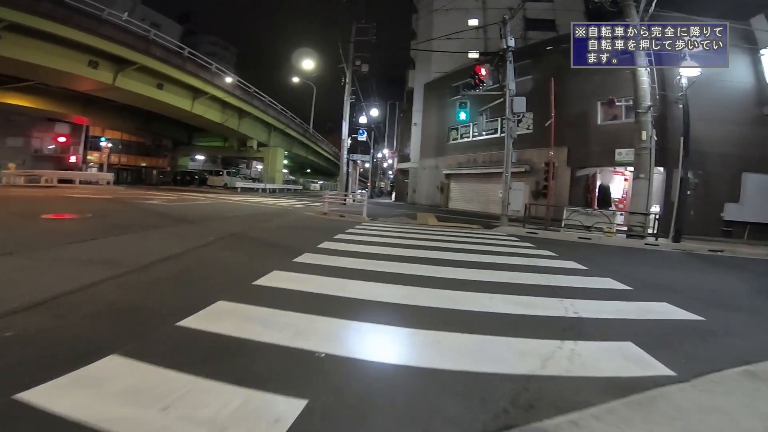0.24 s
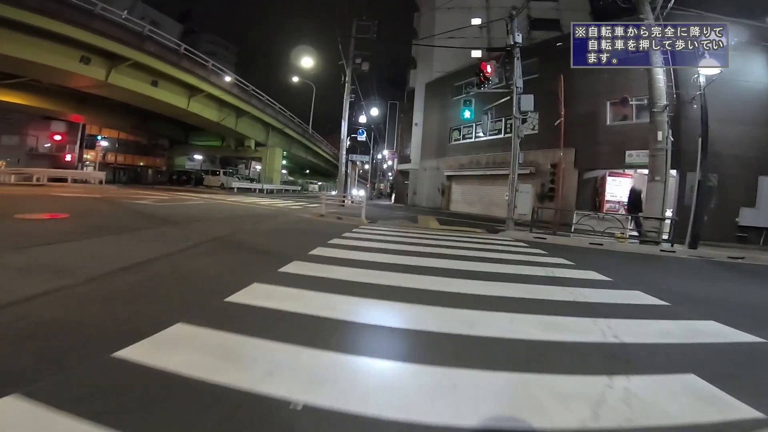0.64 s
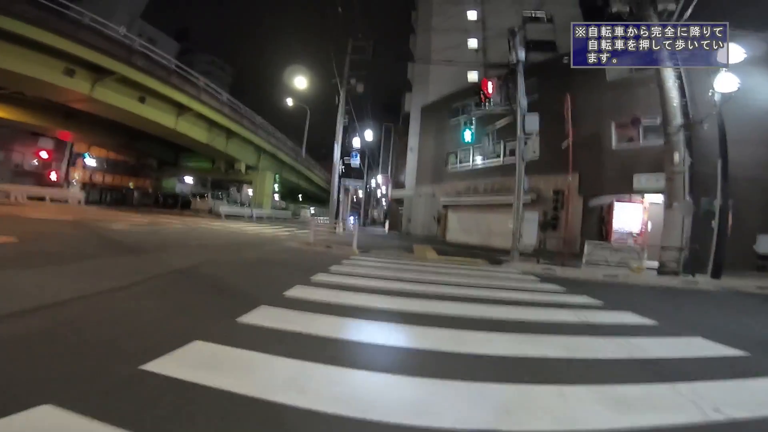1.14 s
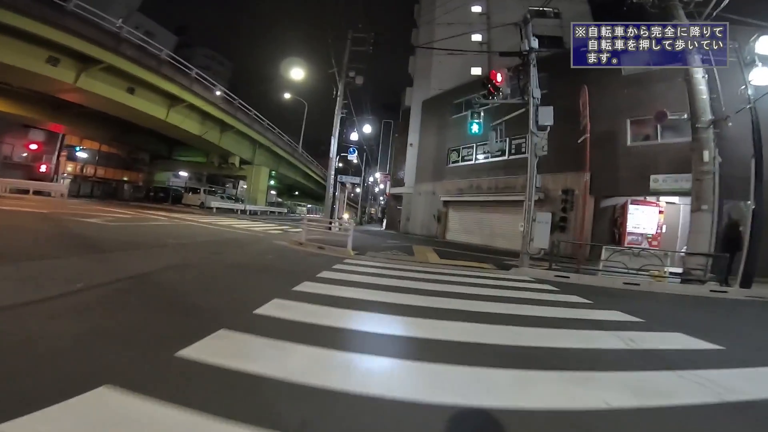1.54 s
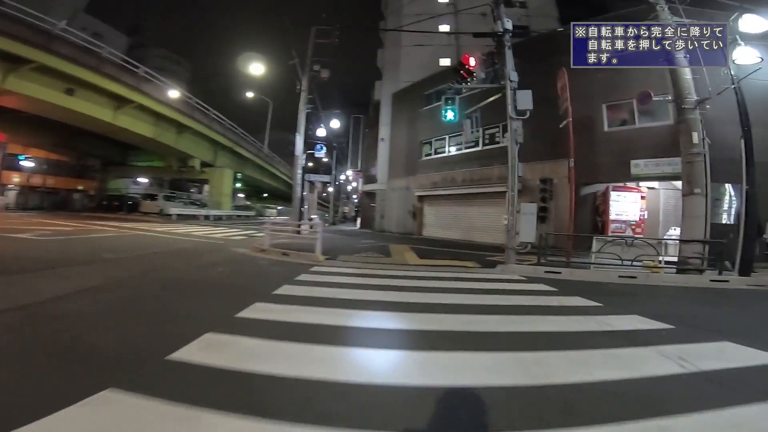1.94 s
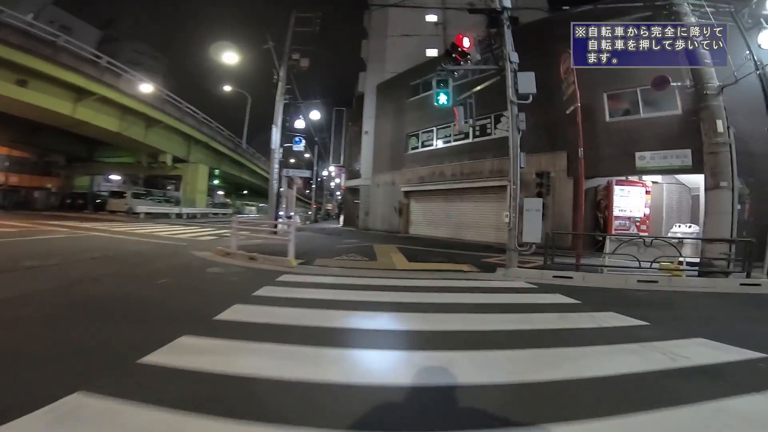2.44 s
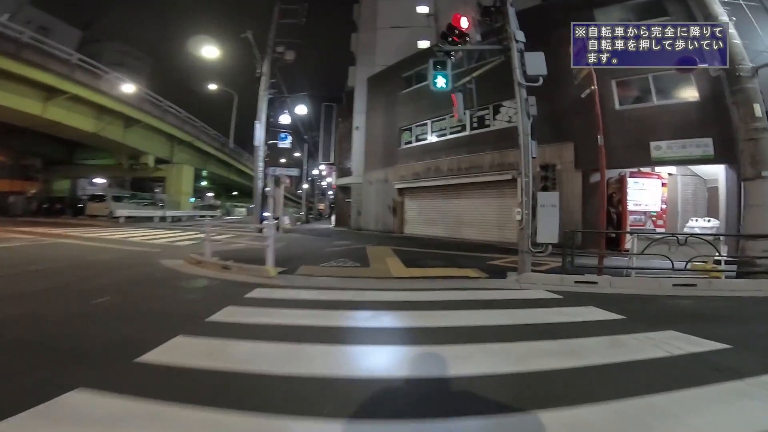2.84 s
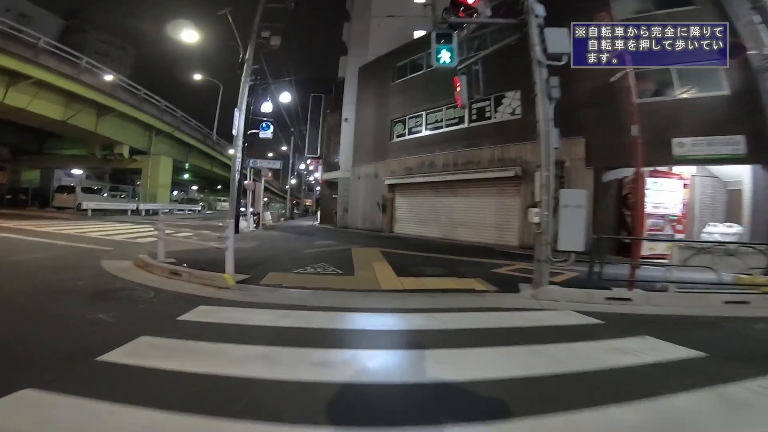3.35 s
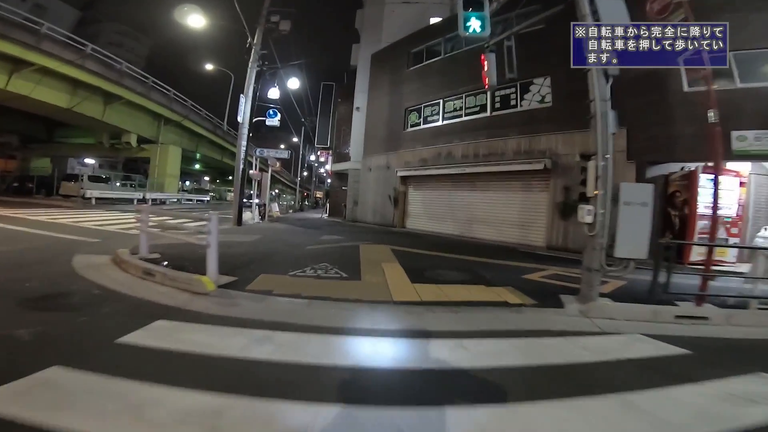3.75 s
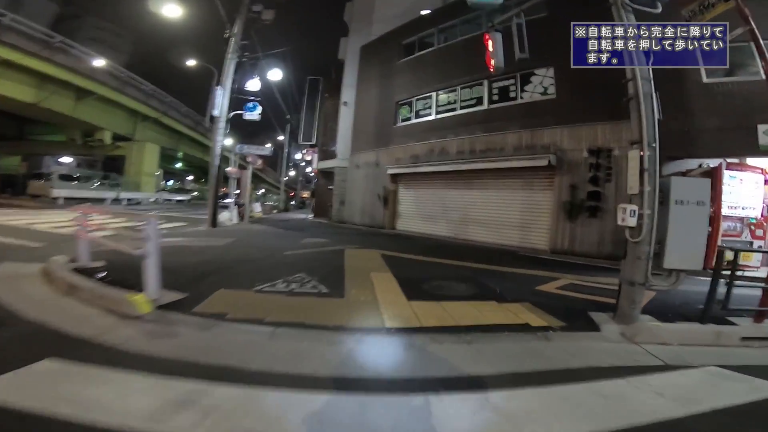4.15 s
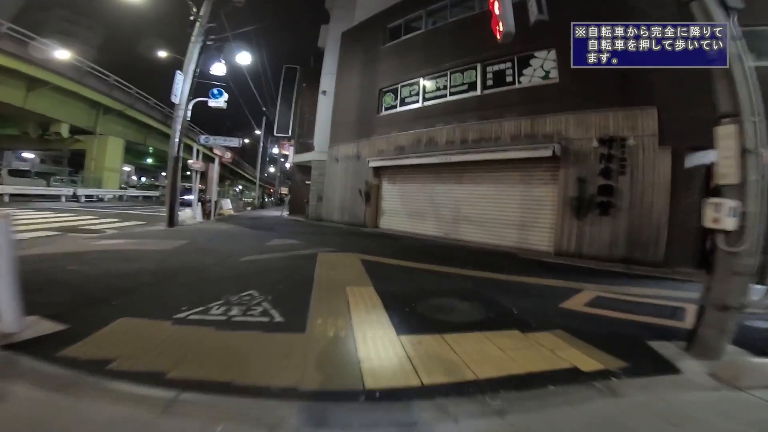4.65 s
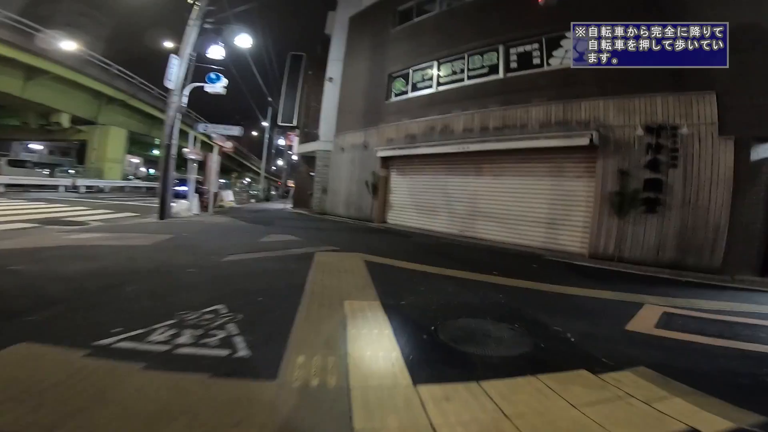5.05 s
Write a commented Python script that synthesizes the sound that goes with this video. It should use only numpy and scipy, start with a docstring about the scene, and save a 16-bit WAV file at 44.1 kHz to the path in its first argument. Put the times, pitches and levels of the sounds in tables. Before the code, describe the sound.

A quiet outdoor street with dull, far-off traffic. Close up, a walked bicycle rumbles and sways, its hub ticking quickly and lightly. An early crowded clatter of kerb bumps gives way to spaced low thuds, small snaps and brief scuffs; two strong knocks come late, then a final cluster. The single-channel sound is close, mount-borne and bass-heavy, slightly flattened on the hardest hits.

```python
"""A bicycle with a microphone on its handlebar is pushed over a kerb and a striped crossing on a quiet night street.
Far traffic, shaped noise, lies under all; the frame sways, tyres rumble, and grit and loose parts click and scuff.
From 0.3 s the freewheel ticks as noise bursts with hub rings; near 0.5 s the first bumps and lurches come.
From 0.95 to 1.4 s kerb bumps crowd together as damped bounces, knocks and cracks; then footfalls and lurches
come more thinly, with hard bumps near 4.2 and 4.7 s and a last cluster near 5.2 s."""
import sys
import numpy as np
from scipy import signal
from scipy.fft import rfft, irfft
from scipy.io import wavfile
from scipy.ndimage import uniform_filter1d

SR = 44100
rng = np.random.default_rng(int(sys.argv[2]) if len(sys.argv) > 2 else 0)


def store_wav(level_fs):
    """Save 16-bit WAV to argv[1]."""
    pcm = np.round(np.clip(np.atleast_2d(level_fs), -1, 1) * 32767)
    wavfile.write(sys.argv[1], SR, pcm.T.astype(np.int16))


N = 233638
AFTER = np.arange(6000) / SR  # time since the start of an event, s


def undb(db):
    """Level to amplitude: 20 dB is a factor of ten."""
    return 10 ** (np.asarray(db) / 20)


def unit(x):
    """Normalisation to an RMS amplitude of one."""
    return x / np.sqrt(np.mean(x ** 2))


def band(x, lo_hz, hi_hz):
    """Band limitation by a Butterworth band-pass of design order two."""
    sos = signal.butter(2, [lo_hz, min(hi_hz, .45 * SR)], "band", fs=SR, output="sos")
    return signal.sosfilt(sos, x)


def noise_band(lo_hz, hi_hz):
    """Band-limited Gaussian noise of unit RMS."""
    return unit(band(rng.standard_normal(N), lo_hz, hi_hz))


def curve(rows):
    """Linear interpolation of a table's columns over time."""
    s, *columns = np.transpose(rows)
    return [np.interp(np.arange(N) / SR, s, c) for c in columns]


def add(out, s, x):
    """Superposition: mixes x in from time s."""
    i = max(int(s * SR), 0)
    out[i:i + len(x)] += x[:N - i]


def walk(rate):
    """Slow random modulation: levels held for 1 / rate s and slewed twice; spread near 1."""
    k = int(SR / rate)
    held = np.repeat(rng.standard_normal(N // k + 1), k)
    return unit(uniform_filter1d(uniform_filter1d(held, k), k)[:N])


def ring(hz, t60, rise_s):
    """Damped resonance: a mode swells for rise_s, then decays exponentially by 60 dB in t60."""
    swell = np.sin(np.pi / 2 * np.minimum(AFTER / rise_s, 1)) ** 2
    decay = 1000. ** (-np.maximum(AFTER - rise_s, 0) / t60)
    return swell * decay * np.sin(2 * np.pi * hz * AFTER)


def town():
    """Spectral shaping of noise: far traffic, in octave bands that swell together and flicker alone."""
    # colour of the traffic: f/Hz, relative spectral level/dB
    town_colour = [(35, -19), (60, -1.5), (87, -26), (183, -20), (253, -13.5), (368, -24.5), (486, -21),
                   (572, -25), (738, -21.5), (1350, -26), (2840, -41.5), (5450, -47), (15500, -67)]
    # loudness of the traffic: t/s, level/dB
    town_swell = [(0.0, -52.5), (0.93, -49.5), (1.44, -49.5), (3.49, -48), (4.92, -50)]
    hz = np.fft.rfftfreq(N, 1 / SR) + 1
    colour_hz, colour_db = np.transpose(town_colour)
    gain = undb(np.interp(np.log(hz), np.log(colour_hz), colour_db))
    colour = rfft(rng.standard_normal(N)) * gain
    colour /= np.std(band(irfft(colour, N), 373, 2700))
    out = 0
    for octave in range(5, 15):  # centred on 2 ** octave Hz
        share = np.clip(1 - np.abs(np.log2(hz) - octave), 0, 1)
        flicker = undb((0.65 - 0.036 * octave) * walk(23))
        out = out + flicker * irfft(colour * share, N)
    return out * undb(curve(town_swell)[0] + 1.0 * walk(2.63))


def rolling():
    """Forced vibration: the frame sways and the tyres keep the mount trembling near its bounce."""
    # rolling shake, strongest over the kerb: t/s, sway level/dB, tyre rumble level/dB
    roll_levels = [(0.0, -32.5, -48), (0.55, -33.5, -48), (0.85, -28, -49), (0.96, -23, -39.5),
                   (1.38, -23.5, -30.5), (1.47, -33, -52), (1.66, -28.5, -43.5), (2.25, -25.5, -41),
                   (2.5, -33.5, -44.5), (2.71, -25.5, -40.5), (3.3, -31, -39.5), (3.42, -29, -44.5),
                   (3.64, -24.5, -41.5), (3.98, -25.5, -44), (4.7, -25, -41.5), (5.29, -34, -49)]
    sway_db, tyre_db = curve(roll_levels)
    sway = noise_band(6.95, 23.9) + undb(-12.0) * noise_band(39.4, 66)
    tremble = noise_band(88, 141.6)
    tremble = tremble + undb(-4.5) * noise_band(44, 185)
    tremble = tremble + undb(-14.5) * noise_band(253, 408)
    return undb(sway_db + 1.7 * walk(9.1)) * sway + undb(tyre_db + 2.1 * walk(14)) * tremble


def freewheel():
    """Impact excitation: pawls dropping milliseconds apart blur into one hiss per tooth; the hub shell rings."""
    # turning of the rear wheel: t/s, ratchet teeth passed
    wheel_turn = [(0.3077, 0), (0.444, 1), (0.5556, 2), (0.7632, 4), (0.856, 5), (1.1039, 8), (1.4244, 12),
                  (1.5848, 14), (1.81, 17), (2.5136, 26), (2.9413, 32), (3.24, 36), (3.6227, 41),
                  (4.1475, 48), (4.2166, 49), (4.4343, 52), (4.9536, 59), (5.1823, 62), (5.2644, 63)]
    # levels used in turn for 15 ticks, recurring each turn: level/dB, high ring/dB re level, # low ring/dB re
    # level; both rings also vary by chance
    tick_levels = [(-50, -4, -8), (-50.5, -5.5, -1), (-50, -13, -10), (-47.5, -27, -8), (-48, -17, -9),
                   (-47.5, -12, -24), (-48, -14, -16), (-50, -15, -5), (-50, -15, -3), (-50, -23, -8),
                   (-50, -10, -11), (-53.5, -9, -9), (-52.5, -12, -3), (-51.5, -14, -10), (-52.5, -9, -3)]
    # hub shell modes, high then low: f/Hz, width/Hz, level/dB
    hub_modes = [(10020, 1500, -5), (5460, 560, -7.5)]
    tick_scatter_db, ring_scatter_db = 0.9, 3.5
    out = np.zeros(N)
    shape = np.minimum(AFTER / 0.0015, 1) * np.exp(-(AFTER / 0.0071) ** 2)
    times, teeth = np.transpose(wheel_turn)
    for tooth in range(int(teeth[-1]) + 1):
        noise = rng.standard_normal(len(AFTER))
        db, *ring_db = tick_levels[tooth % len(tick_levels)]
        tick = undb(-11.5) * unit(band(noise, 5800, 15300)) + undb(-6) * unit(band(noise, 3200, 8700))
        for (hz, width_hz, mode_db), tick_ring_db in zip(hub_modes, ring_db):
            level = undb(tick_ring_db + mode_db + ring_scatter_db * rng.standard_normal())
            tick = tick + level * unit(band(noise, hz - width_hz / 2, hz + width_hz / 2))
        level = undb(db + tick_scatter_db * rng.standard_normal())
        add(out, np.interp(tooth, teeth, times), level * shape * tick)
    return out


def clicks():
    """Transient excitation: a sharp snap with a short noisy tail, band-limited around its centre."""
    # single clicks of grit and loose parts: t/s, peak level/dB, centre f/Hz
    click_list = [(0.188, -44, 2200), (0.2662, -47, 3500), (0.592, -39, 3600), (0.6062, -35, 3500),
                  (0.6468, -43, 5200), (0.923, -30, 5530), (0.9345, -28.5, 4700), (0.938, -32, 2970),
                  (0.951, -26, 2900), (0.992, -38, 5400), (1.018, -33, 1900), (1.0342, -43, 2200),
                  (1.0891, -35, 1700), (1.1105, -30, 1090), (1.1531, -31, 5600), (1.1763, -28, 3100),
                  (1.2098, -39, 3000), (1.2288, -38, 3330), (1.2489, -40, 2090), (1.2613, -29, 3820),
                  (1.267, -41, 2500), (1.3168, -41, 3000), (1.3328, -33, 2780), (1.3764, -33.5, 2520),
                  (1.413, -37, 3630), (1.7061, -42, 2000), (1.8586, -37, 2100), (2.2267, -32, 2960),
                  (2.391, -41, 2800), (2.6107, -41, 3900), (2.9436, -38, 1500), (2.9567, -29.5, 1340),
                  (2.9805, -29, 600), (3.062, -43, 3180), (3.229, -32.5, 1490), (3.3562, -25, 3780),
                  (3.4084, -35, 1470), (3.502, -30, 4860), (3.7152, -37, 2700), (3.7748, -41, 2900),
                  (3.803, -38, 1270), (3.9032, -36.5, 1300), (4.0254, -35, 3600), (4.1646, -26.5, 1770),
                  (4.1866, -30, 2140), (4.2612, -29, 1300), (4.322, -37.5, 4200), (4.4769, -44, 5000),
                  (4.488, -38.5, 2700), (4.5637, -43, 4200), (4.619, -32, 2200), (4.655, -22, 1890),
                  (4.6591, -30.5, 3840), (4.716, -40, 4500), (4.6864, -31.5, 1600), (4.8726, -38, 3300),
                  (4.9774, -41, 4000), (5.136, -35, 1530), (5.2055, -35, 1600), (5.2224, -27, 5140),
                  (5.266, -31.5, 4300)]
    stray_per_s, stray_db, stray_hz = 4, -49.5, 3200  # mostly fainter clicks, at random times
    tail_t60_s = 0.024
    half_octaves, narrowing = 1, 0.1  # half width at 1 kHz; octaves lost per kHz above
    strays = [(u * N / SR, stray_db + 6.5 * v, stray_hz * 2 ** (w - .5))
              for u, v, w in rng.random((stray_per_s * N // SR, 3))]
    out = np.zeros(N)
    for s, db, hz in click_list + strays:
        octaves = max(half_octaves - narrowing * (hz / 1000 - 1), .2)
        lo_hz, hi_hz = hz / 2 ** octaves, hz * 2 ** octaves
        decay = 1000. ** (-AFTER / 0.0019) + 0.16 * 1000. ** (-AFTER / tail_t60_s)
        snap = band(rng.standard_normal(len(AFTER)) * decay, lo_hz, hi_hz)
        # a second pass: little energy lies above the click's band
        snap = band(snap, lo_hz / 4.5, hi_hz * 0.71)
        add(out, s, undb(db) * snap / np.abs(snap).max())
    return out


def scuffs():
    """Granular friction: unequal dense grains; bright ones ring a loose metal part, dull ones scrape the road."""
    # scuffs and rattling: peak t/s, bright level/dB, length/s, dull part/dB re bright
    scuff_list = [(0.183, -67.5, 0.032, 18), (0.591, -49.5, 0.06, 10.5), (0.949, -52, 0.064, 6),
                  (1.015, -50, 0.083, 4.5), (1.109, -53.5, 0.099, 0), (1.15, -49, 0.02, 3),
                  (1.178, -44.5, 0.04, 2), (1.255, -45, 0.082, 1), (1.33, -52, 0.095, 1),
                  (1.423, -57.5, 0.04, 3), (1.744, -64, 0.05, 6), (2.118, -58, 0.051, 13.5),
                  (2.61, -60, 0.04, 6), (2.956, -59, 0.051, 13), (3.062, -54.5, 0.035, 9.5),
                  (3.809, -53, 0.049, 8.5), (4.163, -56, 0.095, 7), (4.263, -57, 0.14, 7),
                  (4.52, -63.5, 0.13, 6), (4.652, -48, 0.043, 11), (4.719, -51.5, 0.046, 5),
                  (4.881, -60.5, 0.064, 9.5), (4.956, -58, 0.049, 7), (5.196, -52, 0.045, 4),
                  (5.222, -49.5, 0.047, 4), (5.261, -47.5, 0.045, 6)]
    grit_db, grit_dull_db = -71, -8  # tyres on fine grit between scuffs: bright level; dull part re bright
    rise_share, span_db = 0.36, 14.5  # share of the length spent rising; dB climbed and dropped within it
    rounding = 0.97  # 1 = pointed, 2 = bell
    t = np.arange(N) / SR
    bright_gain, dull_gain = undb(grit_db), undb(grit_db + grit_dull_db)
    for s, db, length, dull_db in scuff_list:
        away = np.where(t < s, (s - t) / rise_share, (t - s) / (1 - rise_share)) / length
        gain = undb(db - span_db * away ** rounding)
        bright_gain = np.hypot(bright_gain, gain)  # energies add
        dull_gain = np.hypot(dull_gain, gain * undb(dull_db))
    grain = 96  # samples
    size = undb(4.6 * np.minimum(rng.exponential(size=N // grain + 1), 3.5)).repeat(grain)[:N]
    dull, metal = rng.standard_normal((2, N)) * uniform_filter1d(size, size=48)
    bright = unit(band(metal, 2100, 7300))
    bright = bright + undb(-6.5) * unit(band(metal, 3450, 5060))
    bright = bright + undb(-13) * unit(band(metal, 7600, 14000))
    return bright_gain * unit(bright) + dull_gain * unit(band(dull, 600, 1860))


def lurches():
    """Low thumps: each lurch of the frame is a swell with a shallow dip on both sides, as a mic's low cut leaves."""
    # lurches of the frame: centre t/s, level of the swell before the dip/dB, width scale/s
    lurch_list = [(0.481, -10, 0.014), (0.533, -11.5, 0.016), (0.84, -17, 0.023), (0.954, -9, 0.0087),
                  (1.019, -9.5, 0.0064), (1.163, -4.5, 0.0083), (1.213, -15, 0.0085), (1.28, -6, 0.006),
                  (1.342, -8, 0.007), (1.376, -8.5, 0.007), (1.544, -18, 0.04), (1.797, -12.5, 0.032),
                  (2.04, -7, 0.021), (2.29, -12, 0.02), (2.529, -12, 0.023), (2.767, -9, 0.021),
                  (2.985, -14.5, 0.028), (3.042, -13.5, 0.021), (3.17, -11.5, 0.0084), (3.23, -7.5, 0.017),
                  (3.463, -11, 0.025), (3.712, -9.5, 0.012), (3.945, -13.5, 0.025), (4.19, -9.5, 0.014),
                  (4.496, -15.5, 0.017), (4.657, -4, 0.0056), (4.882, -12, 0.017), (5.213, -5, 0.017),
                  (5.276, -5, 0.024)]
    out, t = np.zeros(N), np.arange(-6000, 6000) / SR
    for s, db, width in lurch_list:
        swell = np.exp(-(t / (0.51 * width)) ** 2)
        dip = 0.33 * np.exp(-(t / (1.68 * width)) ** 2)
        add(out, s + t[0], undb(db) * (swell - dip))
    return out


def bumps():
    """Modal impact response: the mount dips and bounces, its case knocks, its clamp cracks; some modes shift."""
    # footfalls and kerb bumps felt through the mount:
    # t/s, bounce level/dB, bounce f/Hz, bounce t60/s, knock/dB re bounce, crack/dB re bounce
    bump_list = [(0.476, -23, 120, 0.041, -22, -21), (0.485, -22.5, 108, 0.036, -12, -39),
                 (0.506, -23.5, 101, 0.12, -12.5, -28), (0.532, -22.5, 123, 0.035, -21, -33),
                 (0.931, -17, 126, 0.12, -15, -35), (0.951, -5.5, 114.5, 0.036, -4.5, -12.5),
                 (0.98, -8.5, 121, 0.018, -18, -23), (1.022, -20, 125, 0.055, -6.5, -15),
                 (1.055, -10.5, 106, 0.064, -10, -27), (1.098, -16.5, 116, 0.074, -22, -25),
                 (1.115, -10.5, 116, 0.038, -11, -29), (1.175, -2.5, 124.3, 0.064, -3, -10.5),
                 (1.187, -9.5, 99, 0.042, -19.5, -32), (1.211, -9.5, 120, 0.04, -9, -19),
                 (1.255, -17.5, 117, 0.053, -8.5, -15), (1.281, -4, 119, 0.026, -7, -13.5),
                 (1.308, -8.5, 103, 0.06, -16.5, -33), (1.339, -11, 121, 0.051, -3.5, -13.5),
                 (1.377, -8, 129, 0.051, -9.5, -19), (1.405, -15, 108, 0.02, -24, -45),
                 (2.04, -22.5, 115, 0.11, -9.5, -30), (2.063, -22, 90, 0.065, -11.5, -27),
                 (2.126, -25.5, 111, 0.043, -8.5, -19), (2.287, -10, 110.4, 0.071, -9, -28),
                 (2.759, -13.5, 114, 0.12, -10, -41), (3.063, -22, 88, 0.12, -16, -25),
                 (3.235, -14, 131.5, 0.063, -6, -23), (3.521, -15.5, 111.3, 0.1, -11, -43),
                 (3.715, -10, 120, 0.045, -3, -19), (3.83, -37.5, 118, 0.053, 5, -11),
                 (4.145, -23, 104, 0.06, -13, -27), (4.188, -4.5, 107, 0.081, -9.5, -27),
                 (4.266, -25.5, 128, 0.067, -4.5, -14), (4.29, -23, 104, 0.073, -12.5, -36),
                 (4.593, -24.5, 112, 0.13, -12.5, -30), (4.656, -1.7, 111.4, 0.044, -5.5, -13.5),
                 (4.688, -19, 91.5, 0.042, -12, -13), (5.213, -11.5, 118.7, 0.097, -12, -20.5),
                 (5.242, -19, 117, 0.077, -17, -38), (5.276, -12.5, 90, 0.021, -10, -33)]
    # modes of the knocked case: nominal f/Hz, level/dB re knock, t60/s
    case_modes = [(286, -6.5, 0.057), (351, -2.5, 0.043), (468, -8, 0.044)]
    crack_lo_hz, crack_hi_hz, crack_t60_s = 400, 1220, 0.025
    clamp_hz, clamp_db, clamp_t60_s = 862, -7, 0.041  # level re crack; frequency before its random shift
    crack_shape = np.minimum(AFTER / 0.0026, 1) * 1000. ** (-AFTER / crack_t60_s)
    out = np.zeros(N)
    for s, db, bounce_hz, bounce_t60, knock_db, crack_db in bump_list:
        # the first crest comes three quarters of a swing after the wheel is lifted
        bounce = -undb(db) * ring(bounce_hz, bounce_t60, rise_s=0.0095)
        add(out, s + 0.00078 - 0.754 / bounce_hz, bounce)
        for hz, mode_db, t60 in case_modes:
            shifted_hz = hz * (1 + 0.0745 * rng.standard_normal())
            knock = undb(db + knock_db + mode_db) * ring(shifted_hz, t60, rise_s=0.0041)
            add(out, s + 0.00044 - 1.315 / hz, knock)
        crack = rng.standard_normal(len(AFTER)) * crack_shape
        for _ in range(2):  # twice, for steep band edges
            crack = band(crack, crack_lo_hz, crack_hi_hz)
        add(out, s - .005, undb(db + crack_db) * crack / np.abs(crack).max())
        shifted_hz = clamp_hz * (1 + 0.04 * rng.standard_normal())
        clamp = undb(db + crack_db + clamp_db) * ring(shifted_hz, clamp_t60_s, rise_s=0.0027)
        add(out, s - 0.003, clamp)
    return out


def scene():
    """Linear superposition of all sources, as one channel."""
    return (town() + rolling() + freewheel() + clicks() + scuffs() + lurches() + bumps())[None]


def record(dry):
    """Saturation and low-pass: the input hisses faintly, flattens the hardest bumps and cuts the top."""
    hiss_db, top_hz = -72.5, 15650
    dry = dry + undb(hiss_db) * rng.standard_normal(N)
    flat = dry / (1 + np.abs(dry / .765) ** 6) ** (1 / 6)
    return signal.sosfilt(signal.ellip(10, .2, 80, top_hz, fs=SR, output="sos"), flat)


dry = scene()
out = record(dry)
store_wav(out)
```